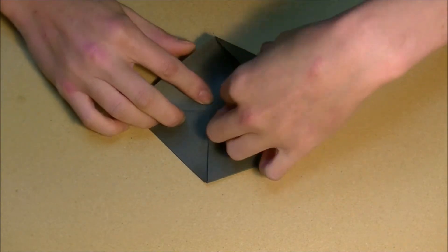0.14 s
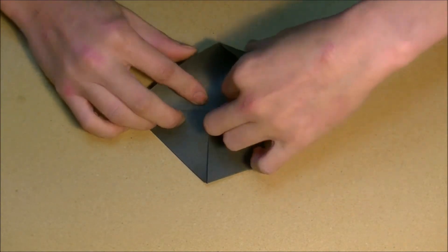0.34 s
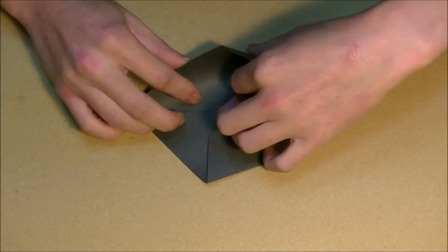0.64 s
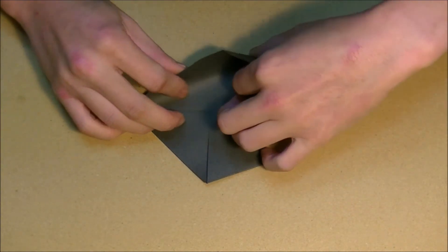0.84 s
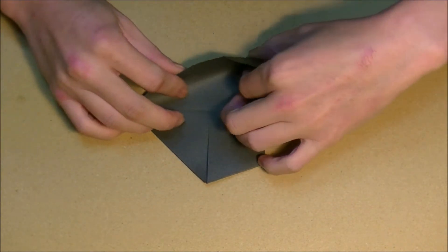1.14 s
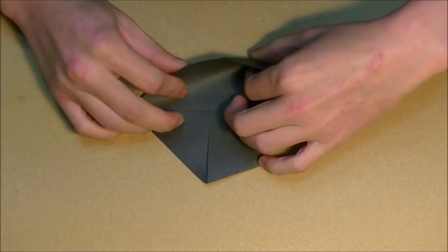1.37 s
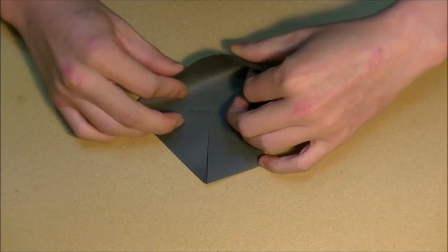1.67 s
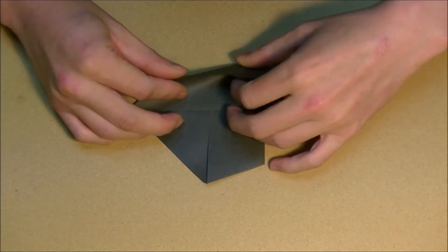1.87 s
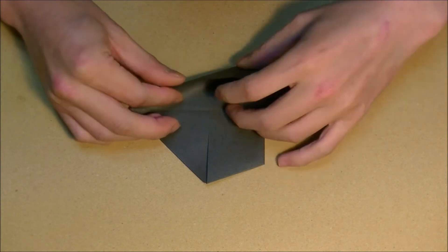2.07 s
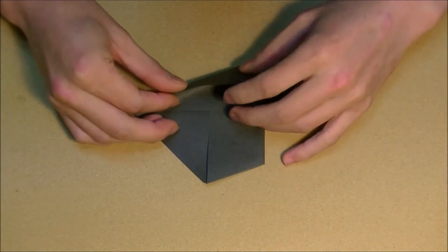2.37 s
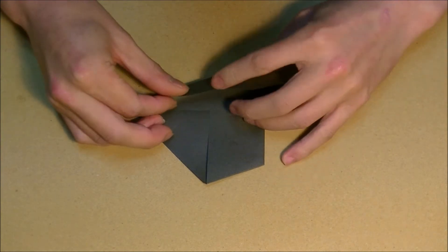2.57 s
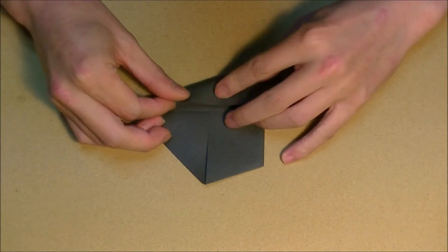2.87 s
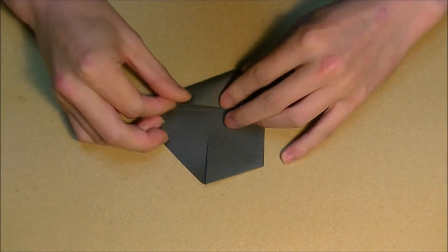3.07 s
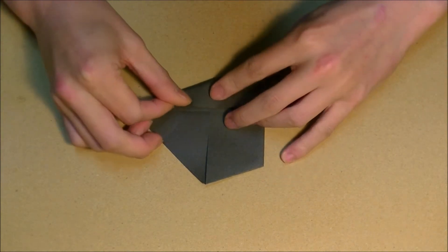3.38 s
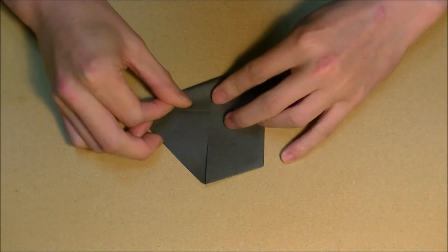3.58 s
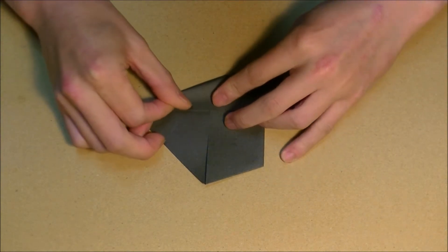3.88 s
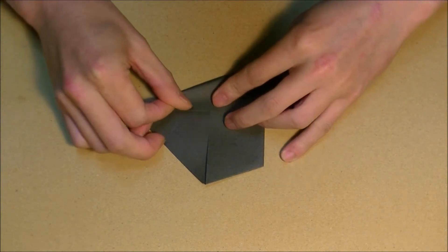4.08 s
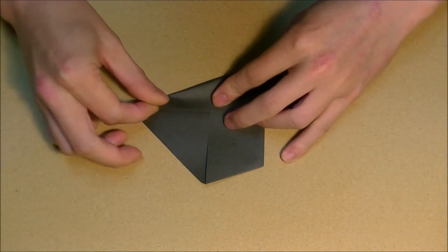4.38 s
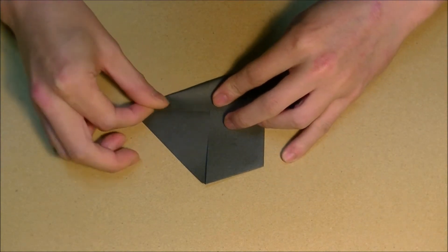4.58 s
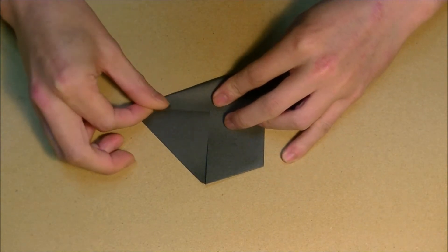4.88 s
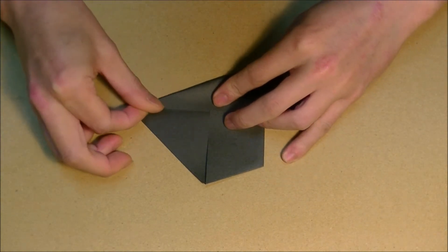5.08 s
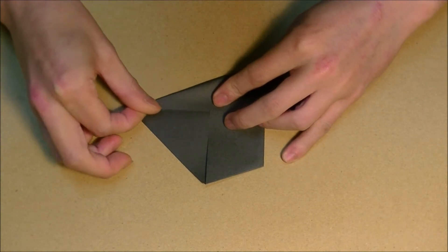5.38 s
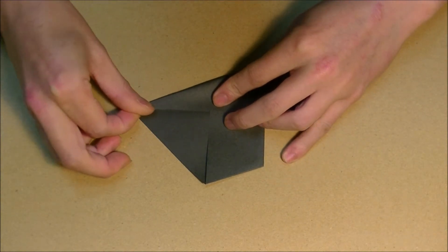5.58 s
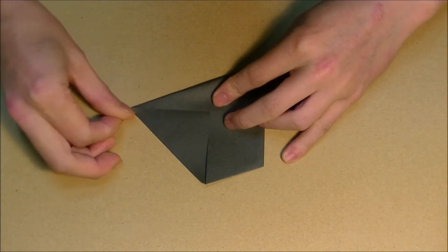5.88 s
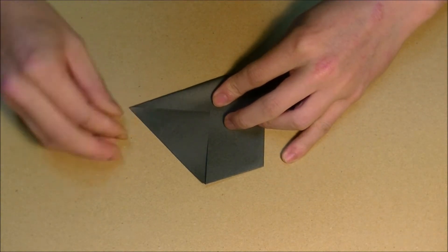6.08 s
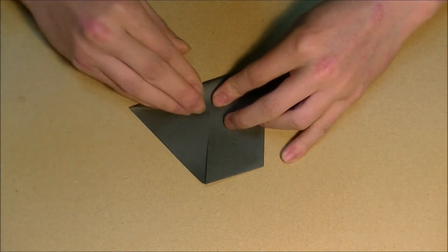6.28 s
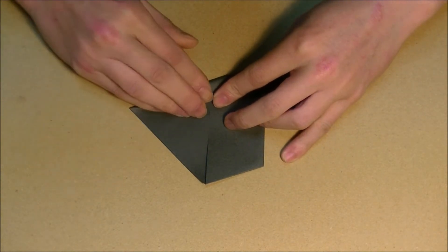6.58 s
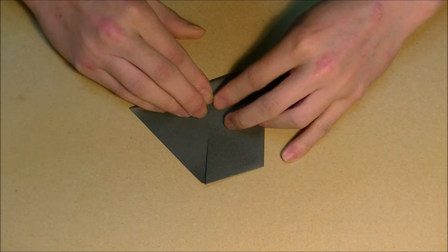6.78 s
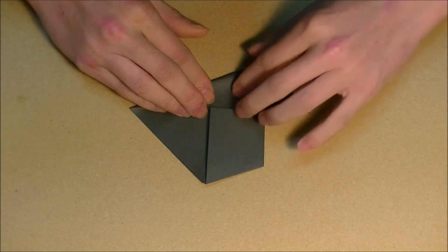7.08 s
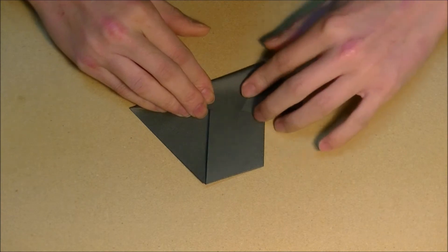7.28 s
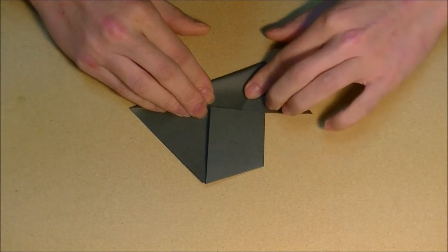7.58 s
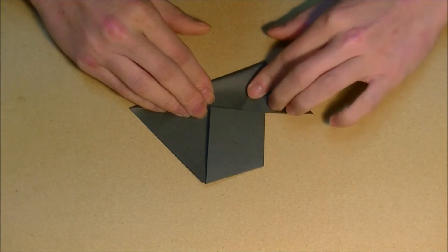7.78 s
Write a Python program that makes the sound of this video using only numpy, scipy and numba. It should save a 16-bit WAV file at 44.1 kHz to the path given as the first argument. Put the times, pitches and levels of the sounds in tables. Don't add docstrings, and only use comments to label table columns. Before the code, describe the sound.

A small stiff sheet of paper is folded by hand on a table, heard very close and slightly left in a small room, over a steady low hush of air and microphone hiss. At 0.15 s a strong crisp crumple with a soft flap tap, then rustling and crackles at 0.35 and 0.44. Dry finger rubs follow from 0.6, with a faint crack at 1.2 and small rustles and ticks between 1.5 and 2.6. At 2.85 a hard bright snap, then a hollow papery rub around 2.95 to 3.1. A thuddy give comes at 3.2, a clear crack at 3.58, a dry crumple at 4.2 and brief rubs. From 4.5 to 6.7 it is nearly quiet, only faint strokes and tiny ticks. Rubbing picks up at 6.8, a sharp crack at 7.0, a short scuff at 7.2, and the loudest snap with a light table slap at 7.5, then faint rustles.

```python
import sys
import numpy as np
from scipy import signal
from scipy.fft import rfft, irfft, next_fast_len
from scipy.io import wavfile
from scipy.ndimage import uniform_filter1d
from numba import njit

SR = 44100
rng = np.random.default_rng(int(sys.argv[2]) if len(sys.argv) > 2 else 0)


def invert_db(level):
    return 10 ** (np.asarray(level, dtype=float) / 20)


def store_pcm(level_fs):
    pcm = np.round(np.clip(level_fs, -1, 1) * 32767).astype(np.int16)
    wavfile.write(sys.argv[1], SR, np.atleast_2d(pcm).T)


N = 350154

# time in seconds, resonance in Hz, level in dB above the sheet.
FOLD = [(0, 670, -12), (0.5, 640, -15.5), (2.7, 784, -19), (2.87, 1010, -12), (2.95, 710, -1.5),
        (3.03, 580, -3.5), (3.15, 720, -15), (4.4, 695, -16), (6.78, 660, -10), (6.86, 680, -26),
        (8, 715, -14)]


def curve(table, hz):
    f, v = np.transpose(table)
    return np.interp(np.log(hz + 1), np.log(f), v)


def along(table, t, axis=1):
    columns = np.transpose(table)
    return np.interp(t, columns[0], columns[axis])


def unit(x):
    return x / np.sqrt(np.mean(x ** 2))


@njit
def svf(x, hz, q):
    y, b, l, k = np.empty(len(x)), 0., 0., 1 / q
    for i in range(len(x)):
        g = np.tan(np.pi * hz[i] / SR)
        v = (b + g * (x[i] - l)) / (1 + g * (g + k))
        b, l, y[i] = 2 * v - b, l + 2 * g * v, k * v
    return y


def band(x, hz, q):
    hz = np.clip(hz + np.zeros(len(x)), 50, .44 * SR)
    return svf(svf(x, hz, 1. * q), hz, 1. * q)


def resonance(x, hz, width_hz):
    return svf(x, np.full(N, 1. * hz), hz / width_hz)


def walk(rate_hz):
    hold = int(SR / rate_hz)
    held = np.repeat(rng.standard_normal(N // hold + 1), hold)
    slewed = uniform_filter1d(uniform_filter1d(held, hold), hold)
    return unit(slewed[:N])


def slips(share, scatter_db):
    hit = rng.random(N) < share
    return hit * rng.standard_normal(N) * invert_db(scatter_db * rng.exponential(size=N))


def strokes():
    # start in seconds, length in ms, level in dB.
    slides = [(0.0, 137, -60), (0.3, 115, -61), (0.625, 58, -58), (0.66, 81, -54.5), (0.74, 114, -60),
              (1.535, 62, -58), (1.58, 96, -55.5), (1.735, 16, -55.5), (1.9, 120, -67.5), (2.67, 48, -59),
              (3.108, 45, -52), (4.245, 63, -54.5), (4.285, 71, -53.5), (4.468, 33, -59.5), (4.89, 57, -72),
              (4.99, 84, -66), (5.35, 91, -68), (5.75, 170, -67), (5.875, 33, -61.5), (6.285, 16, -59),
              (6.39, 53, -64), (6.49, 65, -64), (6.778, 26, -56.5), (6.83, 59, -59), (6.925, 49, -64),
              (7.0, 15, -52), (7.035, 51, -59), (7.2, 23, -47), (7.652, 41, -62.5), (7.78, 22, -70.5)]
    # start in seconds, length in ms, level in dB.
    bends = [(0.086, 60, -52), (0.343, 45, -46), (0.44, 37.5, -40.5), (1.003, 41, -57), (1.07, 135, -63.5),
             (1.31, 63, -60.5), (1.45, 49.5, -55.5), (1.668, 74, -49), (1.81, 63, -57.5), (1.97, 65, -54.5),
             (2.03, 110, -71), (2.095, 160, -54.5), (2.24, 23, -78), (2.268, 25, -60), (2.292, 32, -49),
             (2.366, 18, -51.5), (2.449, 4.6, -51), (2.48, 17, -51), (2.513, 14, -56), (2.549, 7.3, -53.5),
             (2.592, 90, -56.5), (2.8, 49, -67), (2.905, 107, -47.5), (3.15, 71, -57), (3.5, 15, -53),
             (3.7, 100, -78), (6.865, 69, -57), (7.222, 60, -58), (7.285, 140, -57.5)]
    # start in seconds, length in ms, level in dB.
    shivers = [(0.16, 72, -43), (1.2, 180, -65.5), (2.175, 50, -48), (2.862, 124, -51), (3.02, 16, -54.5),
               (3.21, 27, -59), (3.36, 69, -73.5), (3.6, 22, -67), (7.137, 21, -61), (7.165, 41, -55.5),
               (7.5, 54, -52.5), (7.857, 18, -74)]
    # time in seconds, centre in Hz.
    sheet_pitch = [(0, 2260), (0.2, 2850), (1.8, 2750), (2.0, 2260), (2.7, 2450), (2.92, 2920), (3.7, 2400),
                   (4.25, 3670), (5.8, 2460), (6.4, 3220), (8, 3130)]
    # strokes, hiss dB and hollow dB re sheet, share of the stroke spent pressing on
    kinds = ((slides, -3, 0, 0.096),
             (bends, -10.5, 0, 0.18),
             (shivers, -16, -0.5, 0.16))
    creep_s, creep_db = 0.037, -11.5
    t = np.arange(N) / SR
    power = np.zeros((3, N))
    for table, hiss_db, hollow_db, rise in kinds:
        offsets_db = np.array([[0], [hiss_db], [hollow_db]])
        for start_s, ms, db in table:
            span = slice(int(start_s * SR), int((start_s + ms / 500) * SR))
            gone = (t[span] - start_s) * 1000 / ms
            press = np.clip(gone / rise, 0, 1) * np.clip((1.15 - gone) / 0.62, 0, 1)
            power[:, span] += (press * invert_db(db + offsets_db)) ** 2
    decay = np.exp(-1 / (creep_s * SR))
    power += invert_db(2 * creep_db) * signal.lfilter([1 - decay], [1, -decay], power)
    sheet, hiss, fold = np.sqrt(power)
    return sheet, hiss, fold * invert_db(along(FOLD, t, axis=2)), along(sheet_pitch, t)


def rubbing():
    sheet_gain, hiss_gain, fold_gain, sheet_hz = strokes()
    grain = slips(.2, 1.7) * invert_db(1.8 * walk(60))
    wander = invert_db(2.06 * walk(12))
    sheet = unit(band(grain, sheet_hz, 0.85))
    sheet += 0.53 * unit(band(grain, sheet_hz * wander, 0.61))
    sheet += 0.58 * unit(band(grain, 1500 * wander, 0.94))
    fine = slips(.3, 1.4)
    hiss = unit(band(grain + 4.4 * fine, 9400 * wander ** 0.3, 0.85))
    fold_hz = along(FOLD, np.arange(N) / SR)
    fold = unit(band(grain, fold_hz * wander ** 0.63, 2.96))
    return invert_db(-3.5) * (sheet_gain * unit(sheet) + hiss_gain * hiss + invert_db(0.5) * fold_gain * fold)


def creases():
    # time in seconds, peak in dB, ring in Hz, thud in dB, edge in dB.
    crumples = [
        (0.0857, -39, 2070, -11, -8),
        (0.1549, -12, 2900, -16, -7),
        (0.3514, -30, 3000, -11, -7),
        (0.4366, -27, 3100, -13, -3),
        (3.1817, -34, 3000, 2, -24),
        (3.4973, -36, 2500, -17, -21),
        (4.2351, -28, 3350, -25, -10),
    ]
    # time in seconds, peak in dB, ring in Hz, thud in dB, edge in dB.
    cracks = [
        (1.1932, -40, 2890, -21, -14),
        (2.8527, -12, 2900, -28, -14),
        (2.8558, -21, 1450, -32, -30),
        (3.5751, -23, 3200, -17, -13),
        (4.1896, -37, 3480, -25, -4),
        (6.9907, -19, 3420, -32, -8),
        (7.4927, -8, 3700, -36, -5),
    ]
    # time in seconds, peak in dB, ring in Hz, edge in dB.
    ticks = [(0.4626, -35, 4350, -5), (0.6251, -44, 3250, -6), (1.5354, -47, 2310, -22),
             (2.3139, -40, 2710, -8), (2.3688, -42, 2380, -16), (2.4531, -47, 1820, -25),
             (2.4826, -45, 1770, -7), (2.5154, -48, 2100, -10), (2.5534, -51, 2280, -18),
             (3.0811, -41, 1340, -7), (3.4414, -54, 2020, -15), (3.5953, -34, 2410, -30),
             (3.6799, -47, 2590, -7), (4.1445, -50, 2490, 1), (4.153, -41, 2260, -15),
             (4.9769, -54, 3100, 0), (5.343, -52, 2510, -2), (5.5316, -54, 2980, 5),
             (5.7266, -48, 1600, -8), (5.8712, -49, 2340, -1), (6.2815, -42, 2110, -3),
             (6.8095, -49, 2340, 0), (6.8227, -33, 2710, -9), (6.9558, -48, 2770, -3),
             (7.1336, -41, 2960, -20), (7.2123, -33, 3720, -17), (7.6499, -41, 3520, 6),
             (7.6738, -46, 2570, 6), (7.6847, -50, 4400, -1), (7.8556, -52, 2210, -2)]
    rows = [(*row, 1.43) for row in cracks]
    for row in crumples:
        rows.append((*row, 2.74 * invert_db(.22 * (row[1] + 31))))
    for s, db, hz, edge_db in ticks:
        thud_db = -1 + along(FOLD, s, axis=2)
        rows.append((s, db, hz, thud_db, edge_db, 2.35))
    return sorted(rows)


def snaps():
    size = 2048
    out = np.zeros(N + size)
    t_ms = np.arange(size) * 1000 / SR
    for s, db, hz, thud_db, edge_db, ms in creases():
        ms = np.clip(ms, .2, 12)
        gate, sign = rng.standard_normal((2, size))
        run = 0.22 * ms * (gate > 1.2) * sign * np.exp(-t_ms / ms)
        run[0] = 1.4
        ring = band(band(run, hz, 0.43), hz, 0.43)
        edge = band(run, 9960, 0.97)
        thud = band(band(run, 703, 1.23), 703, 1.23)
        parts = ((0, ring), (edge_db, edge), (thud_db, thud))
        shot = sum(invert_db(g) * v / np.abs(v).max() for g, v in parts)
        first = int(s * SR)
        out[first:first + size] += invert_db(db - 0.5) * shot
    return out[:N]


def slaps():
    # time in seconds, peak in dB.
    hits = [
        (0.1545, -42),
        (0.3514, -52),
        (0.437, -44),
        (7.4926, -35),
    ]
    out, t = np.zeros(N), np.arange(N) / SR
    for s, db in hits:
        age = np.clip((t - s) / 0.00037, 0, 40)
        out += invert_db(db) * age * (2 - age) * np.exp(-age)
    return out


def pocket(x):
    # (centre in Hz, width in Hz, level in dB).
    grips = [
        (0.6, [(1190, 280, -4.5), (1570, 460, -1), (2420, 300, -9), (3550, 700, -7), (4980, 180, -2), (6270, 400, -1)]),
        (2.8, [(1310, 140, -5), (1620, 190, 6), (1940, 73, -1), (2230, 33, 2), (2940, 34, -2), (3340, 510, -0.5)]),
        (2.9, [(1190, 190, 0), (2320, 190, 2.5), (3750, 720, 4)]),
        (3.3, [(1630, 130, 3), (2540, 330, 3), (3130, 690, 3)]),
        (3.8, [(1300, 320, 8), (2590, 170, 9), (3210, 490, 10.5), (10300, 4400, 3)]),
        (7.45, [(1400, 410, -10), (1740, 150, -0.5), (2560, 130, -0.5), (3296, 400, 1.5), (3800, 33, -13), (4530, 590, -2)]),
        (8, [(1860, 85, 10), (3730, 790, 5), (4340, 450, 3), (1310, 110, -4)]),
    ]
    out, t, start = x.copy(), np.arange(N) / SR, 0
    for until, modes in grips:
        part = x * ((t >= start) & (t < until))
        out += sum(invert_db(db) * resonance(part, hz, width_hz) for hz, width_hz, db in modes)
        start = until
    return out


def shade(x):
    # start in seconds, end in seconds, centre in Hz, width in Hz.
    shadows = [
        (2.84, 2.9, 6300, 2000),
        (3.45, 3.8, 6900, 2600),
        (7.45, 8, 6000, 1800),
    ]
    t = np.arange(N) / SR
    lost = np.zeros(N)
    for s, until, hz, width_hz in shadows:
        lost += ((t >= s) & (t < until)) * resonance(x, hz, width_hz)
    return x - .85 * lost


def capsule(x):
    # frequency in Hz, gain in dB.
    housing = [(380, -2.5), (600, 0.5), (2000, 2), (5100, -0.5), (5700, -1), (6500, -1), (7600, 3),
               (9500, 5), (13000, -0.5), (15500, -3.5)]
    size = 512
    hz = np.arange(size // 2 + 1) * SR / size
    cepstrum = irfft(np.log(invert_db(curve(housing, hz))), size)
    cepstrum[1:size // 2] *= 2
    cepstrum[size // 2 + 1:] = 0
    response = irfft(np.exp(rfft(cepstrum)), size)
    return signal.fftconvolve(x, response)[:N]


def room(x):
    # frequency in Hz, decay time T60 in seconds.
    t60_s = [(300, 0.49), (1000, 0.28), (2500, 0.26), (5000, 0.23), (9000, 0.23), (15000, 0.39)]
    # frequency in Hz, tail level in dB.
    colour_db = [(300, -14), (1000, 7.5), (2500, 2), (4500, 5), (6000, 6.5), (9000, -6), (15000, -1)]
    # frequency in Hz, side re mid in dB.
    width_db = [(500, -2), (2000, -29.5), (5000, -10), (12000, 6.5)]
    # delay in ms, level in dB.
    echoes = [
        (1.6, -45),
        (3.3, -15),
        (8.5, -51),
        (12.5, -24.5),
    ]
    room_db, onset_s = -10.5, 0.0015
    size = SR // 2
    t = np.arange(size) / SR
    noise = rng.standard_normal((2, size))
    tail = 0
    for hz in 250 * 2 ** np.arange(0, 6.1, .5):
        fade = invert_db(curve(colour_db, hz) - 60 * t / np.clip(curve(t60_s, hz), .05, 1))
        mid, side = (band(v, hz, 0.94) for v in noise)
        tail = tail + fade * np.array([mid, side * invert_db(curve(width_db, hz))])
    tail = tail * np.clip(t / onset_s, 0, 1) ** 2
    mid, side = invert_db(room_db) * tail / np.sqrt(np.sum(tail[0] ** 2))
    response = np.array([mid + side, mid - side])
    response[:, 0] = 1
    for k, (ms, db) in enumerate(echoes):
        lag = int(ms * SR / 1000)
        response[k % 2, lag] -= invert_db(db)
        response[1 - k % 2, lag + 2] -= invert_db(db)
    return signal.fftconvolve(x[None], response, axes=1)[:, :N]


def hush():
    # frequency in Hz, density in dB per Hz.
    spectrum_db = [(15, -55.5), (25, -22.5), (180, -21.5), (250, -9), (335, -1), (520, -4), (714, -0.5),
                   (1000, -5.5), (1400, -8.5), (2400, -13.5), (5000, -17.5), (10000, -22), (13500, -24.5),
                   (15600, -31)]
    # frequency in Hz, side minus mid in dB.
    side_db = [(60, 5.5), (110, 10.5), (200, 0), (380, -3), (700, -2), (1290, 0), (2380, 0.5), (4400, -1),
               (8120, -0.5), (15000, -3)]
    size = next_fast_len(N)
    hz = np.arange(size // 2 + 1) * SR / size
    mid, side = rfft(rng.standard_normal((2, size))) * invert_db(curve(spectrum_db, hz))
    mid = irfft(mid, size)
    side = irfft(side * invert_db(curve(side_db, hz)), size)[:N]
    scale = invert_db(-63) / np.std(mid)
    mid = mid[:N]
    return scale * invert_db(.8 * walk(2.5)) * np.array([mid + side, mid - side])


def scene():
    left_db = 1.2
    paper = capsule(shade(pocket(rubbing() + snaps())))
    stereo = room(paper + slaps())
    return stereo * invert_db(np.array([[left_db], [-left_db]]) / 2) + hush()


def roll_off(x):
    return signal.sosfilt(signal.butter(12, 17150, fs=SR, output="sos"), x)


def record(dry):
    lowpass = signal.ellip(6, .2, 20, 15600, fs=SR, output="sos")
    mix = signal.sosfilt(lowpass, dry)
    return roll_off(mix)


dry = scene()
out = record(dry)
store_pcm(out)
```